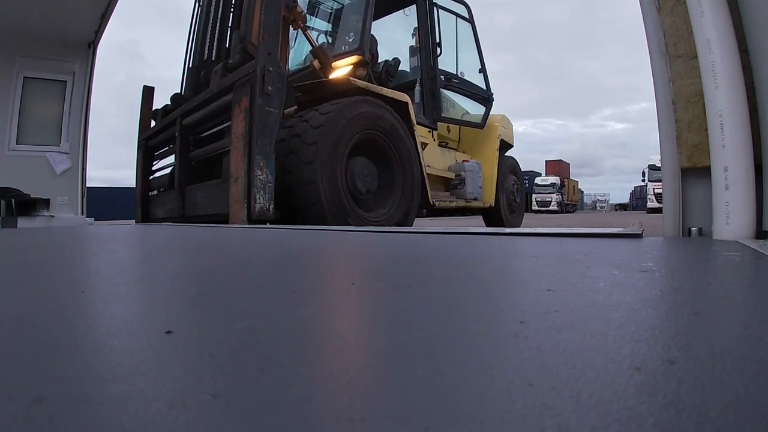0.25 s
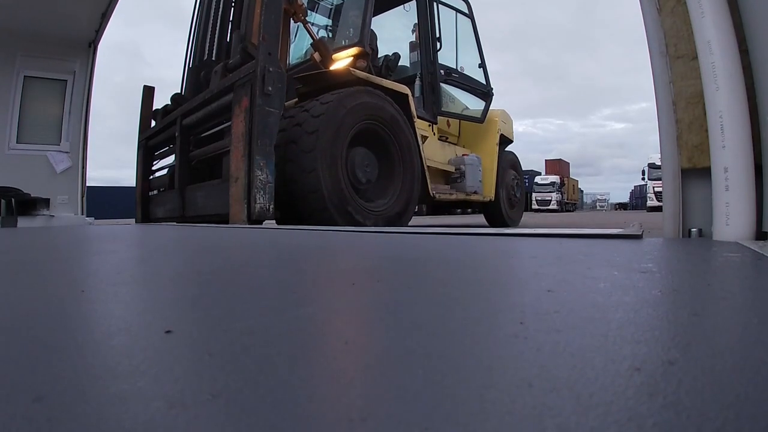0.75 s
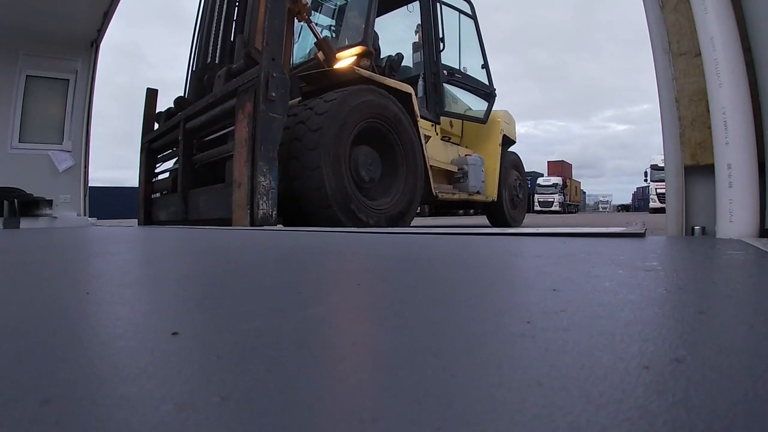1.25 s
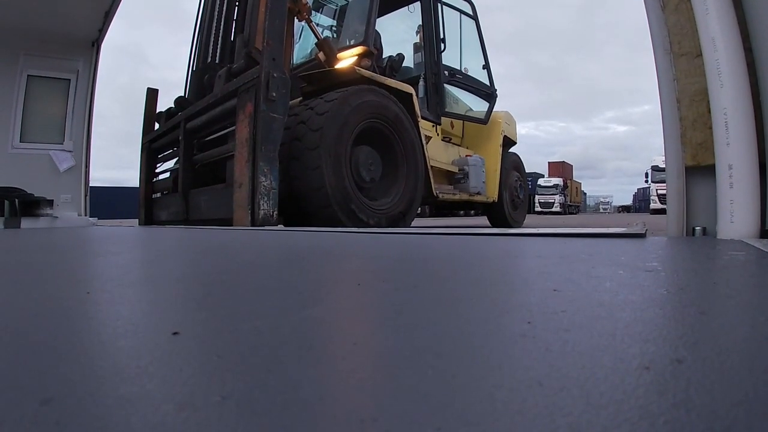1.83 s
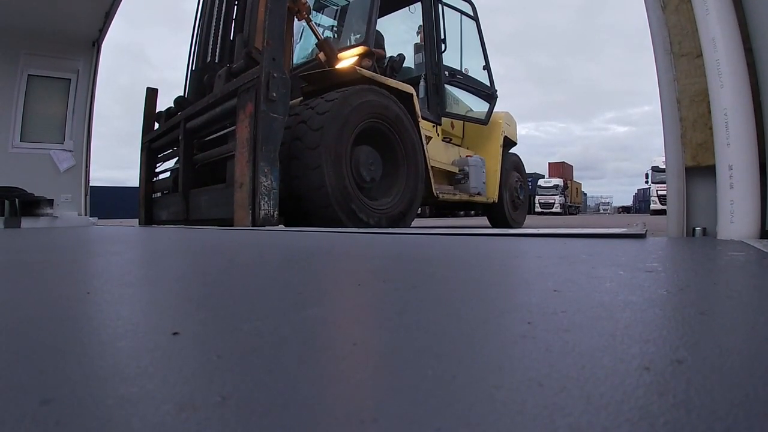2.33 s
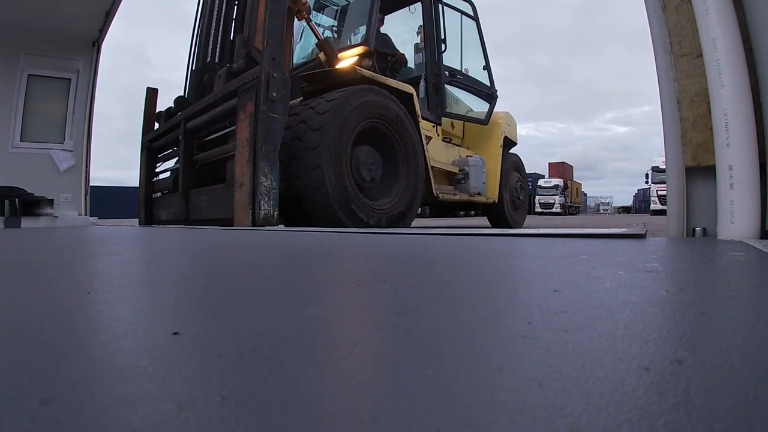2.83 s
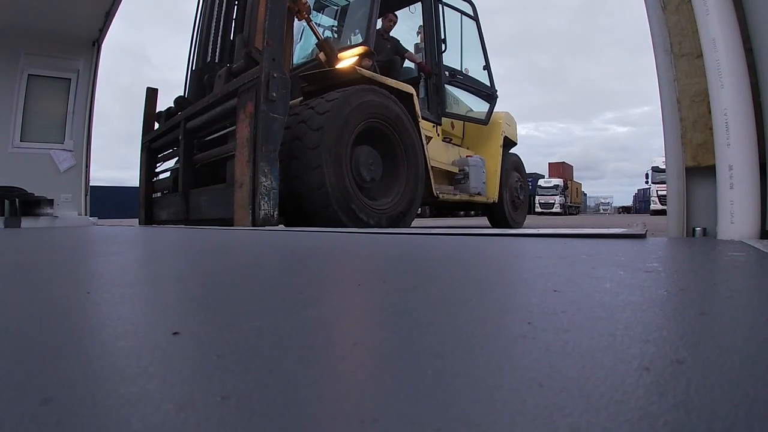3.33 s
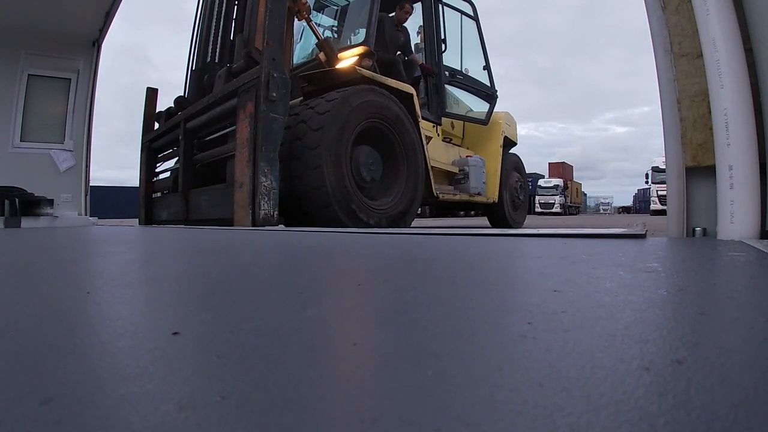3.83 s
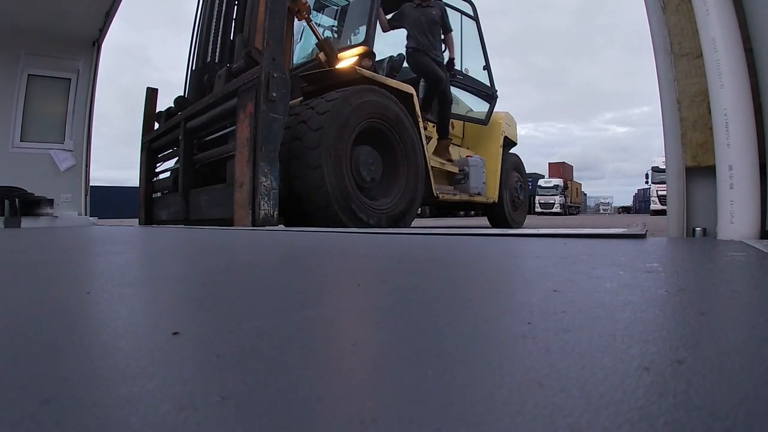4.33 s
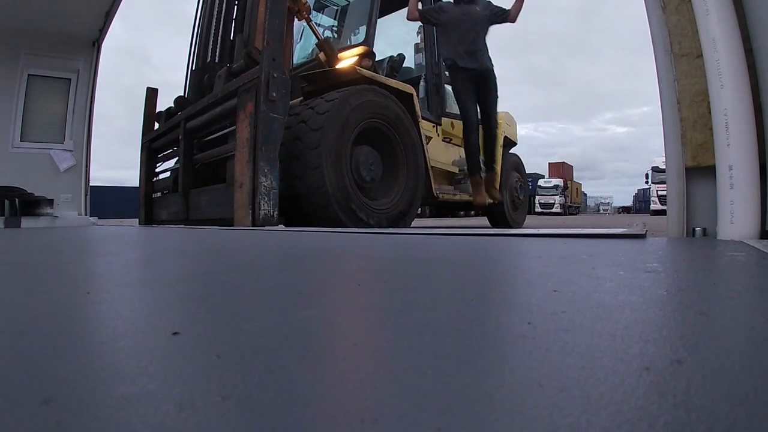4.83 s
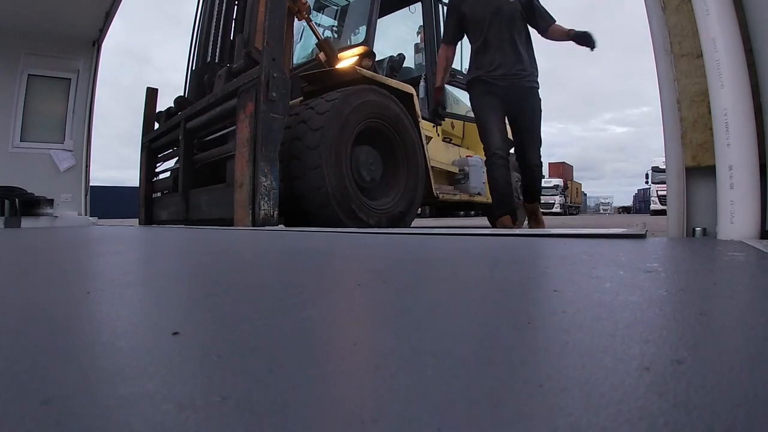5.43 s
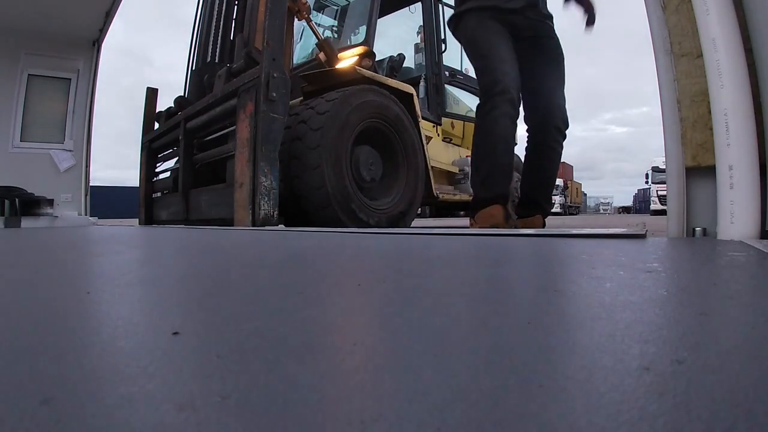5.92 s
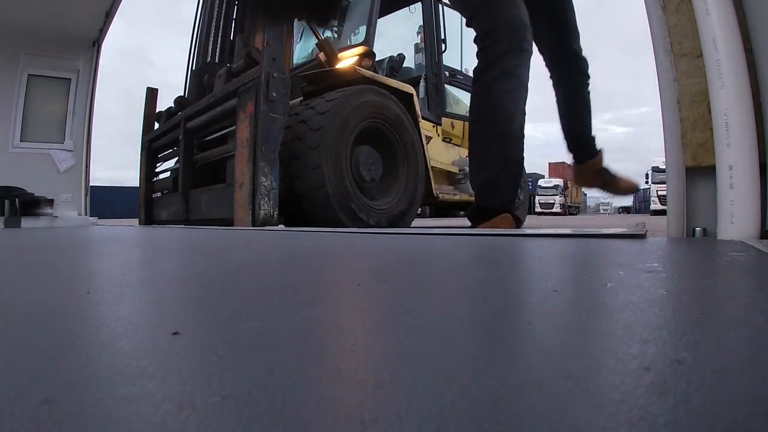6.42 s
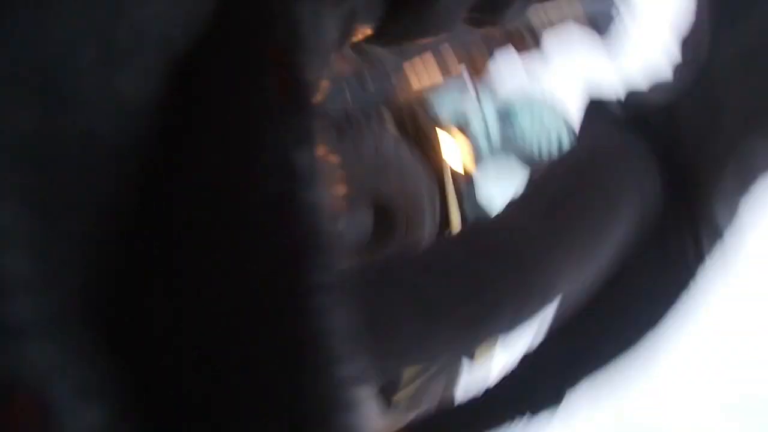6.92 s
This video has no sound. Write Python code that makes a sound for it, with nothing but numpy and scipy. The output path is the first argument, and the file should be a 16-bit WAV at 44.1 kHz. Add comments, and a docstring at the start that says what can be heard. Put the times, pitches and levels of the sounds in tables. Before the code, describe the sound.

A big forklift's six-cylinder diesel idles steadily just outside an open cabin door, booming and humming low. The machine groans to a halt with heavy thuds, rattling panels and a steel clank. A short whistling spit of air follows, then a harsher barking gush. The driver steps down with a knock and light scuffs. Finally a hand rubs and bumps the microphone on the floor, muffling everything.

```python
"""A heavy forklift's six-cylinder diesel idles throughout, just outside the open door of a cabin: firing-locked
tones and noise bursts. A wavering tone groans as the machine rolls to a stop, with thuds and rattles of decaying
modes and noise, and a steel clank. A thin noise hiss follows, then a spit of air with a whistling tail, and a
barking gush that eases to a rush. The driver steps down with a knock and scuffs. At last a hand bumps and half
covers the microphone. The recorder's gain ducks after loud blows."""
import sys
import numpy as np
from scipy import signal
from scipy.fft import rfft, irfft, next_fast_len
from scipy.io import wavfile
from scipy.ndimage import minimum_filter1d

SR = 44100
rng = np.random.default_rng(int(sys.argv[2]) if len(sys.argv) > 2 else 0)


def transcribe(signal):
    """Save signal, clipped to [-1, 1], as a 16-bit WAV file at the path in sys.argv[1]."""
    frames = np.atleast_2d(signal).T
    limited = np.clip(frames, -1, 1)
    pcm = np.round(limited * 32767).astype(np.int16)
    wavfile.write(sys.argv[1], SR, pcm)


N = 316197
TIME = np.arange(N) / SR


def from_db(db):
    """Decibels to amplitude gain."""
    return 10 ** (np.asarray(db) / 20)


def rms_one(x):
    """Scale to unit rms."""
    return x / np.sqrt(np.mean(x ** 2) + 1e-20)


def in_time(rows):
    """Interpolate a curve's columns at every sample."""
    seconds, *columns = np.transpose(rows)
    return [np.interp(TIME, seconds, column) for column in columns]


def drift(rate_hz):
    """Slow random curve through normal draws, rate_hz of them a second."""
    return np.interp(TIME * rate_hz, np.arange(2000), rng.standard_normal(2000))


def lift(hz, mode):
    """Gain in dB of a resonance; it halves at half_width_hz from the centre."""
    centre_hz, half_width_hz, peak_db = mode
    return peak_db / (1 + ((hz - centre_hz) / half_width_hz) ** 2)


def lowpass(x, top_hz):
    """Third-order low-pass."""
    return signal.sosfilt(signal.butter(3, top_hz, fs=SR, output="sos"), x)


def coloured(x, spectrum, modes=(), echo=0):
    """Give a signal a spectrum, resonances and the comb of close wall echoes; rms 1."""
    spectrum_hz, spectrum_db = np.transpose(spectrum)
    size = next_fast_len(N)
    bins_hz = np.maximum(np.fft.rfftfreq(size, 1 / SR), 1)
    gain_db = np.interp(np.log(bins_hz), np.log(spectrum_hz), spectrum_db)
    gain_db = gain_db + sum(lift(bins_hz, mode) for mode in modes)
    walls = np.zeros(size)
    walls[0] = 1
    delays_s = rng.uniform(.002, .022, 10)
    walls[(delays_s * SR).astype(int)] = echo * rng.choice([-1, 1], 10)
    return rms_one(irfft(rfft(x, size) * from_db(gain_db) * rfft(walls), size)[:N])


def noise(spectrum, modes=()):
    """Coloured noise of rms 1 with wall echoes."""
    return coloured(rng.standard_normal(N), spectrum, modes, echo=0.15)


def dying(start_s, t60_s, rise_s):
    """Envelope of a blow: exponential rise times an even decay in dB."""
    age = np.maximum(TIME - start_s, 0)
    return (1 - np.exp(-age / rise_s)) * from_db(-np.minimum(60 * age / t60_s, 200))


def add_mode(out, start_s, hz, db, t60_s):
    """Add one struck mode; it builds up within its first cycle."""
    at = int(start_s * SR)
    age = TIME[:min(int(2 * t60_s * SR), N - at)]
    build = 1 - np.exp(-3 * hz * age)
    decay = from_db(db - 60 * age / t60_s)
    out[at:at + len(age)] += build * decay * np.sin(2 * np.pi * hz * age)


def swell(shape, spectrum, flutter_db=0, modes=()):
    """Turbulent noise that builds up, holds and dies away."""
    start_s, attack_s, hold_s, t60_s, level_db = shape
    rise = np.clip((TIME - start_s) / attack_s, 0, 1) ** 2
    fall_db = np.clip(60 * (TIME - start_s - attack_s - hold_s) / t60_s, 0, 200)
    level = from_db(level_db - fall_db + flutter_db * drift(120))
    return rise * level * noise(spectrum, modes)


def contact_clicks(per_s):
    """Random clicks of either sign: tiny contacts between loose parts."""
    return rng.choice([-1, 1], N) * (rng.random(N) < per_s / SR)


# Standing waves of cabin and panels. Each row: centre in Hz, half width in Hz, lift in dB.
CABIN_MODES = [(110.7, 2.24, 11), (161, 14, 3.5), (504, 8.9, 10.5), (559.2, 7.3, 9)]


def tones(turns, rpm, orders, waver, waver_hz):
    """Sines locked to the crankshaft; each wavers, and swells as it crosses a standing wave."""
    out = np.zeros(N)
    for order, db in orders:
        hz = order * rpm / 60
        # a different delay per order merges the firings into a smooth throb
        delay_cycles = .183 * order ** 2
        phase = 2 * np.pi * (order * turns - delay_cycles) + waver * drift(waver_hz)
        swell_db = sum(lift(hz, mode) for mode in CABIN_MODES)
        level = from_db(db + swell_db) * (1 + waver * drift(waver_hz))
        out += level * np.sqrt(2) * np.sin(phase)
    return out


# Relative strength of each cylinder's firing in dB, in firing order.
CYLINDERS = [0.94, 0.21, -0.7, 0.48, -0.068, -0.26]


def firings(turns, repeat, fade, depth):
    """A noise burst per firing: part repeats with every two-turn cycle, part is new each time."""
    cycle, stroke = turns / 2 % 1, turns * 3
    number = stroke.astype(int)
    chance_db = 0.2 * rng.standard_normal(number[-1] + 1)
    strength = from_db(np.array(CYLINDERS)[number % len(CYLINDERS)] + chance_db[number])
    pattern = rng.standard_normal(6000)
    same = pattern[(cycle * len(pattern)).astype(int)]
    grain = np.sqrt(repeat) * same + np.sqrt(1 - repeat) * rng.standard_normal(N)
    # fade: decay in strokes; depth: share of the noise that decays
    return grain * strength * (1 - depth + depth * np.exp(-(stroke % 1) / fade))


# Boom level. Each row: time in seconds, relative level in dB.
BOOM_LEVEL = [(0, 0.5), (1.0, 1), (1.12, -6), (1.2, -3), (1.28, 5.5), (1.4, 1), (1.47, 6), (1.99, -3.5),
              (2.1, 7.5), (2.35, 2.5), (2.65, 5), (2.78, -1), (3.0, -0.5), (3.4, -1), (7.17, 0)]
# Lowest cabin resonance, met by the firing rate at idle: centre in Hz, half width in Hz, lift in dB.
BOOM_MODE = (40.1, 1.9, 5.25)


def boom(turns, rpm):
    """A sine at the firing rate, three per turn, lifted by the cabin's lowest resonance."""
    firing_hz = 3 * rpm / 60
    level_db, = in_time(BOOM_LEVEL)
    unsteady_db = .6 * drift(12)
    gain = from_db(level_db + lift(firing_hz, BOOM_MODE) + unsteady_db)
    return gain * np.cos(2 * np.pi * 3 * turns)


# Low tones of exhaust and belt-driven parts. Each row: multiple of crank speed, relative level in dB.
EXHAUST_ORDERS = [(4, -17), (7, -16), (7.8, -10.5), (8.8, -15), (9, -17), (10, -16), (10.3, -14),
                  (11, -15.5), (13, -17), (15.6, -20), (16, -23), (17, -22), (22, -21.5)]
# Low throb. Each row: multiple of crank speed, relative level in dB.
THROB_ORDERS = [(5, -8.5), (6, -8.5)]
# Throb level. Each row: time in seconds, relative level in dB.
THROB_LEVEL = [(0, 3), (.45, -7), (.8, -3), (1.15, -7), (1.6, -3), (2.7, -0.5), (3.4, .5), (4.6, -1),
               (5.5, 3), (7.17, -1)]
# Drone at four times the firing rate. Each row: multiple of crank speed, relative level in dB.
DRONE_ORDERS = [(12, -9.5)]
# Drone level. Each row: time in seconds, relative level in dB.
DRONE_LEVEL = [(0, -2.5), (1.55, -5.5), (1.68, 3.5), (1.9, 3.5), (2.1, 4), (2.4, -3.5), (2.75, -17),
               (2.98, 3), (3.3, -4.5), (4.1, -1), (5.1, -1.5), (7.17, 1)]
# Spectrum of the puffs. Each row: frequency in Hz, relative level in dB.
EXHAUST_SPECTRUM = [(15, -12), (45, -0.5), (75, -2.5), (105, 0.5), (140, 4), (170, 1.5), (187, -7.5),
                    (212, 2), (260, -12.5), (400, -64.5), (2000, -100)]


def exhaust(turns, rpm):
    """Crank-locked hum, throb and drone, with a noise puff per firing."""
    hum = tones(turns, rpm, EXHAUST_ORDERS, waver=.19, waver_hz=6)
    throb_db, = in_time(THROB_LEVEL)
    throb = from_db(throb_db) * tones(turns, rpm, THROB_ORDERS, waver=.17, waver_hz=6)
    drone_db, = in_time(DRONE_LEVEL)
    drone = from_db(drone_db) * tones(turns, rpm, DRONE_ORDERS, waver=.19, waver_hz=6)
    puffs = coloured(firings(turns, repeat=0.21, fade=0.68, depth=0.5), EXHAUST_SPECTRUM)
    return hum + throb + drone + from_db(-6.4) * puffs


# Tones of panels and pumps. Each row: multiple of crank speed, relative level in dB.
PANEL_ORDERS = [(18, -9.5), (19.5, -13), (23, -13), (24, -19), (26, -13.5), (29, -13), (30, -17),
                (38, -16.5), (41.7, -27.5), (42, -17.5), (43.4, -16.5), (46, -19.5)]
# Spectrum of the shaking. Each row: frequency in Hz, relative level in dB.
PANEL_SPECTRUM = [(180, -32.5), (235, -8), (310, 6.5), (370, 0), (440, -1), (510, 0.5), (580, -4.5),
                  (640, -7.5), (740, -9.5), (850, -22), (1200, -62.5), (4000, -100)]
# Panel resonances, fixed at any speed. Each row: centre in Hz, half width in Hz, lift in dB.
SINGING_MODES = [(490, 7.8, 4), (563, 6.4, 6), (567, 4, 4.5)]


def panels(turns, rpm):
    """Crank-locked tones of panels and pumps, plus firing noise ringing the panels."""
    shake = coloured(firings(turns, repeat=0.24, fade=0.65, depth=0.093), PANEL_SPECTRUM, SINGING_MODES)
    return tones(turns, rpm, PANEL_ORDERS, waver=0.3, waver_hz=8) + from_db(-1.0) * shake


# Spectrum of the clatter. Each row: frequency in Hz, relative level in dB.
CLATTER_SPECTRUM = [(400, -8.5), (800, -7), (1000, -2.5), (1350, 0.5), (1800, -5), (2600, -4.5),
                    (3600, -9.5), (4400, -11.5), (5300, -16.5), (6750, -21), (7200, -28), (8200, -36.5),
                    (12000, -41.5), (14500, -71)]
# Engine block resonances. Each row: centre in Hz, half width in Hz, lift in dB.
BLOCK_MODES = [(1106, 17, 1), (1195, 34, 0.5), (1960, 30, 0.5), (2480, 27, 2), (3100, 37, 2),
               (3670, 36, 4.5), (4340, 98, 2.5)]


def clatter(turns):
    """Knocking noise bursts, one per firing, ring the engine block."""
    knocks = firings(turns, repeat=.35, fade=.4, depth=.3)
    return coloured(knocks, CLATTER_SPECTRUM, BLOCK_MODES, echo=0.085)


# Crankshaft speed, hunting until it settles at idle. Each row: time in seconds, speed in rpm.
SPEED = [(0.0, 810), (0.12, 813), (0.35, 793.2), (0.6, 801.7), (0.82, 782.4), (1.0, 819.5), (1.18, 754),
         (1.38, 843.5), (1.55, 792), (1.72, 795), (1.9, 762.5), (2.25, 774), (2.5, 825.3), (2.74, 862.4),
         (2.92, 838.8), (3.2, 814.6), (4.2, 805.2), (5.1, 799.4), (7.17, 799.7)]
BOOM_DB, EXHAUST_DB, PANEL_DB, CLATTER_DB = -23, -18.5, -32, -40.5
# hand over the microphone: level change per voice, then a growing loss; the clatter is low-passed
COVER_AT_S, COVER_TAKES_S = 6.755, .03
COVER_BOOM_DB, COVER_EXHAUST_DB, COVER_PANEL_DB, COVER_CLATTER_DB = -6.5, -6, -6.5, 2.5
COVER_DB_PER_S, COVER_TOP_HZ = -11, 4599


def engine():
    """Three firings a turn boom, puff, shake panels and rattle the block; at last a hand muffles them."""
    rpm, = in_time(SPEED)
    turns = np.cumsum(rpm) / SR / 60
    since_cover_s = np.maximum(TIME - COVER_AT_S, 0)
    covered = np.minimum(since_cover_s / COVER_TAKES_S, 1)
    block = clatter(turns)
    block = block * (1 - covered) + lowpass(block, COVER_TOP_HZ) * covered
    voices = [(boom(turns, rpm), BOOM_DB, COVER_BOOM_DB),
              (exhaust(turns, rpm), EXHAUST_DB, COVER_EXHAUST_DB),
              (panels(turns, rpm), PANEL_DB, COVER_PANEL_DB),
              (block, CLATTER_DB, COVER_CLATTER_DB)]
    mix = sum(from_db(db + cover_db * covered) * voice for voice, db, cover_db in voices)
    return from_db(COVER_DB_PER_S * since_cover_s) * mix


# Running gear. Each row: time in seconds, pitch in Hz, level in dB.
GROAN = [(.33, 147.7, -50), (.42, 144.4, -19.5), (.53, 130.7, -28), (.68, 131.4, -32), (.8, 127, -33),
         (.9, 117, -18.5), (.99, 101.7, -16), (1.06, 95, -15), (1.14, 94, -59)]
GROAN_WAVER = 0.091   # radians of phase, and share of level


def groan():
    """A low, wavering sine that sinks as the machine rolls to a stop."""
    hz, db = in_time(GROAN)
    phase = 2 * np.pi * np.cumsum(hz) / SR + GROAN_WAVER * drift(30)
    return from_db(db) * (1 + GROAN_WAVER * drift(34)) * np.sqrt(2) * np.sin(phase)


# Dull blows. Each row: start in seconds, level in dB, pitch in Hz, t60 in seconds, overtone in dB re the pitch.
THUDS = [(.428, -22, 375, 0.46, -10), (.43, -22, 418, 0.51, -17), (.432, -19, 193, .3, -9),
         (.872, -11, 101, 0.23, -12), (0.884, -8.5, 195, 0.17, -6.5), (1.003, -12, 448, 0.066, -5),
         (1.006, -5.5, 277, 0.054, 2.5), (1.005, 2.5, 87, 0.13, -8), (1.016, 1, 198.6, 0.067, -8),
         (1.032, -11.5, 395, .12, -10), (1.047, -16.5, 238, 0.31, -2), (1.222, -12.5, 319, 0.19, -18),
         (1.228, -16, 494, 0.11, -15), (1.271, -4, 41.4, 0.35, -27), (1.275, 0.5, 83, 0.2, -16),
         (1.352, -9, 319, 0.2, -15.5), (1.352, -13, 407, 0.25, -21.5), (1.363, 1.5, 39.7, 0.2, -11),
         (1.41, -6.5, 137.7, 0.28, -6), (1.93, -17, 391.1, 0.24, -7.5), (1.93, -21, 235, 0.34, -4),
         (3.19, -16, 313.3, 0.095, -12), (3.19, -12, 110.1, 0.16, -9), (4.921, -9.5, 225.6, 0.073, -2.5),
         (5.331, -6.5, 204, 0.14, -1), (6.762, -2, 91.9, 0.046, -3.5), (6.762, -7.5, 271.9, 0.031, 0.5)]


def thuds():
    """Each dull blow rings a low mode and an overtone just above it."""
    out = np.zeros(N)
    for start_s, db, hz, t60_s, overtone_db in THUDS:
        add_mode(out, start_s, hz, db, t60_s)
        add_mode(out, start_s, hz * 1.25, db + overtone_db, t60_s)
    return out


# Hard blows: the steel clank with lighter knocks around it, and the driver's step down.
# Each row: start in seconds, ring in dB, crack in dB, crack rise in seconds, crack t60 in seconds, crack top in Hz.
HARD_BLOWS = [(1.003, -38, -23, .0014, 0.056, 2000), (1.036, -34, -19.5, .01, 0.46, 980),
              (1.15, -34.5, -17.5, 0.017, 0.5, 2980), (1.326, -24, -33.5, 0.0035, 0.081, 1514),
              (1.345, -10.5, -3, 0.0014, 0.19, 8550), (1.39, -27, -22.5, 0.0016, 0.46, 6000),
              (5.327, -30, -16, 0.0009, 0.12, 9140)]
# Ringing modes. Each row: frequency in Hz, relative level in dB, t60 in seconds.
RING_MODES = [(550, -10, 0.09), (580, -15, 0.22), (668, -16, 0.13), (970, -9.5, 0.099), (1060, -2.5, 0.1),
              (1110, -9, 0.11), (1300, -14.5, 0.2), (1600, -17, 0.13), (2070, -21.5, 0.2),
              (2530, -26.5, 0.073), (2950, -23, 0.22), (3583, -16.5, .11), (4490, -22.5, 0.2),
              (4797, -23, 0.18)]
# Spectrum of the crack. Each row: frequency in Hz, relative level in dB.
CRACK_SPECTRUM = [(200, 19), (500, 5.5), (1200, 0), (2000, -9.5), (3800, -9), (5500, -17), (6800, -16.5),
                  (8500, -28.5), (12500, -31), (15000, -52)]
STRIKE_SPREAD_DB = 1.5   # of each mode, from blow to blow
CRACK_CONTACTS_PER_S, CONTACT_POWER_SHARE = 1200, .5


def hard_blows():
    """Hard contact: a grainy crack, duller for a softer contact, and the ring of the modes."""
    contacts = rms_one(contact_clicks(CRACK_CONTACTS_PER_S))
    hiss = rng.standard_normal(N)
    grain = np.sqrt(CONTACT_POWER_SHARE) * contacts + np.sqrt(1 - CONTACT_POWER_SHARE) * hiss
    crack = coloured(grain, CRACK_SPECTRUM, echo=0.11)
    out = np.zeros(N)
    for start_s, ring_db, crack_db, rise_s, t60_s, top_hz in HARD_BLOWS:
        out += from_db(crack_db) * dying(start_s, t60_s, rise_s) * lowpass(crack, top_hz)
        for hz, db, ring_t60_s in RING_MODES:
            mode_db = ring_db + db + rng.normal(0, STRIKE_SPREAD_DB)
            add_mode(out, start_s + rng.uniform(0, 0.0045), hz, mode_db, ring_t60_s)
    return out


# Loose panels. Each row: start in seconds, level in dB, centre in Hz, rise in seconds, t60 in seconds.
RATTLES = [(.42, -23.5, 398, 0.0061, 0.61), (0.989, -34, 1400, .004, 0.16),
           (1.003, -31, 1610, 0.0011, 0.052), (1.034, -21.5, 1450, 0.012, 0.13),
           (1.034, -20, 416, 0.0057, 0.34), (1.155, -27, 2040, 0.013, 0.17),
           (1.155, -18.5, 377, 0.019, 0.4), (1.227, -22.5, 1500, 0.014, 0.15),
           (1.221, -18.5, 378, 0.0077, 0.28), (1.347, -18.5, 367, 0.003, 0.33),
           (1.9, -24.5, 329, 0.033, 2.2), (3.185, -23, 404.7, 0.0084, 0.16),
           (5.33, -30.5, 1389, 0.0041, 0.2), (5.328, -19, 315, 0.0033, 0.26)]
RATTLE_CONTACTS_PER_S, RATTLE_SPREAD = 900, 1.325   # band: centre / spread to centre * spread


def rattles():
    """A quick, uneven run of small contacts rings one panel and dies away."""
    out = np.zeros(N)
    for start_s, db, hz, rise_s, t60_s in RATTLES:
        band_hz = [hz / RATTLE_SPREAD, hz * RATTLE_SPREAD]
        panel = signal.butter(3, band_hz, "band", fs=SR, output="sos")
        ringing = rms_one(signal.sosfilt(panel, contact_clicks(RATTLE_CONTACTS_PER_S)))
        out += from_db(db) * dying(start_s, t60_s, rise_s) * ringing
    return out


# Swell: start, attack, hold and t60 in seconds, level in dB.
SPIT_SWELL = (3.465, .052, .04, .27, -31.5)
WHISTLE_SWELL = (3.53, .05, .06, .34, -37.5)
# Spectra. Each row: frequency in Hz, relative level in dB.
SPIT_SPECTRUM = [(300, -34), (1000, 1), (1600, -6), (2400, 1), (4000, -0.5), (6800, -5), (8500, -12),
                 (13000, -19.5), (15500, -36)]
WHISTLE_SPECTRUM = [(1500, -13), (3600, -4), (4350, -1), (5100, -17), (6200, -9), (7200, -33), (13000, -37),
                    (15500, -55)]
# Resonances. Each row: centre in Hz, half width in Hz, lift in dB.
SPIT_MODES = [(1599.4, 139, 9), (2602, 49.7, 7.5), (4500, 67, 0)]
WHISTLE_MODES = [(4130, 45, 8), (4350, 25, 9), (6010, 40, 6), (6300, 80, 4)]


def air_spit():
    """A turbulent spit of air; narrow high resonances whistle in its tail."""
    spit = swell(SPIT_SWELL, SPIT_SPECTRUM, flutter_db=0.5, modes=SPIT_MODES)
    return spit + swell(WHISTLE_SWELL, WHISTLE_SPECTRUM, modes=WHISTLE_MODES)


# Swells: start, attack, hold and t60 in seconds, level in dB.
GUSH_SWELL = (4.911, .016, .095, .13, -22.8)
RUSH_SWELL = (4.9, .03, .33, .22, -25.3)
BARK_SWELL = (4.912, .008, .014, .1, -28)
SURGE_SWELL = (5.17, .06, .045, .13, -34.5)
# Spectra. Each row: frequency in Hz, relative level in dB.
RUSH_SPECTRUM = [(100, -11.5), (250, 16.5), (550, 5.5), (800, -5.5), (1200, -1.5), (2400, -4), (3500, -7.5),
                 (5000, -12), (6700, -15), (8200, -26.5), (12500, -29), (15000, -46)]
BARK_SPECTRUM = [(900, -19), (1500, -10), (1900, 10), (2200, -18), (3200, -29), (8000, -60)]
SURGE_SPECTRUM = [(600, -19), (1200, -1.5), (1700, 5), (2700, 1.5), (3600, -14), (8000, -35.5),
                  (15000, -67)]
# Resonances. Each row: centre in Hz, half width in Hz, lift in dB.
GUSH_MODES = [(417.8, 24.7, 8.3), (1777, 122, 8.1), (2370, 72, 9.1), (2952, 120, 6)]
RUSH_MODES = [(572.9, 15, 10.5), (1140, 90, 6.5), (1670, 54, 4.5), (2300, 77, 2.5), (2790, 64, 3)]


def air_gush():
    """Turbulent air opens with a short bark, eases to a rush and surges gently before it shuts."""
    gush = swell(GUSH_SWELL, RUSH_SPECTRUM, modes=GUSH_MODES)
    rush = swell(RUSH_SWELL, RUSH_SPECTRUM, modes=RUSH_MODES)
    bark = swell(BARK_SWELL, BARK_SPECTRUM)
    surge = swell(SURGE_SWELL, SURGE_SPECTRUM)
    return gush + rush + bark + surge


# Swell: start, attack, hold and t60 in seconds, level in dB.
HAND_SWELL = (6.714, .05, .012, .07, -23)
# Spectrum of the rub. Each row: frequency in Hz, relative level in dB.
RUB_SPECTRUM = [(80, 13.5), (350, 2), (650, 10.5), (1000, 1.5), (1800, 2), (3500, -7.5), (6500, -17),
                (8500, -27), (13000, -41), (15500, -42)]
# Slips of the skin. Each row: start in seconds, level in dB.
CATCHES = [(6.742, -23), (6.747, -32), (6.756, -24), (6.762, -18.5), (6.775, -28), (6.778, -42)]
# Spectrum of the slips. Each row: frequency in Hz, relative level in dB.
CATCH_SPECTRUM = [(200, 9), (700, 10), (1400, -7), (3500, 1), (6000, -8), (8500, -26), (13000, -31),
                  (15500, -37)]
CATCH_T60_S = 0.028


def hand():
    """A fluttering noise rub, and sharp little slips of skin on the microphone's housing."""
    rub = swell(HAND_SWELL, RUB_SPECTRUM, flutter_db=3.0)
    envelope = sum(from_db(db) * dying(start_s, CATCH_T60_S, rise_s=.0003) for start_s, db in CATCHES)
    return rub + envelope * coloured(rng.standard_normal(N), CATCH_SPECTRUM)


# Light scuffs and rattles. Each row: start in seconds, level in dB, t60 in seconds.
SCUFFS = [(.62, -37.5, 0.21), (.718, -39, 0.16), (1.035, -39, 0.37), (1.153, -41.5, 0.31),
          (2.53, -38, 0.062), (5.491, -40, 0.14), (5.519, -29, 0.041), (5.885, -38, 0.067),
          (5.902, -38, 0.049)]
# Spectrum of the scuffs. Each row: frequency in Hz, relative level in dB.
SCUFF_SPECTRUM = [(600, -22), (2000, -10.5), (3300, 5), (5000, -2.5), (6500, -3), (8200, -20), (12500, -23),
                  (15000, -36.5)]


def scuffs():
    """Short, bright and slightly grainy noise rubs."""
    envelope = sum(from_db(db) * dying(start_s, t60_s, rise_s=0.0019) for start_s, db, t60_s in SCUFFS)
    grain = from_db(1.5 * drift(200))
    return envelope * grain * noise(SCUFF_SPECTRUM)


# Swell: start, attack, hold and t60 in seconds, level in dB.
LEAK_SWELL = (1.72, .15, .66, .3, -63)
# Spectrum of the hiss. Each row: frequency in Hz, relative level in dB.
LEAK_SPECTRUM = [(5000, -11), (7500, -0.5), (8800, -13), (9800, -7), (11000, -2), (12200, -7), (13500, -13),
                 (15000, -35)]


def air_leak():
    """A thin, faint hiss of leaking air: high, fluttering noise."""
    return swell(LEAK_SWELL, LEAK_SPECTRUM, flutter_db=1.0)


def scene():
    """Engine, groan, blows, escaping air, scuffs and the hand, summed to one channel."""
    machine_and_blows = engine() + groan() + thuds() + hard_blows() + rattles()
    air = air_spit() + air_gush() + air_leak()
    return (machine_and_blows + air + hand() + scuffs())[None]


def smoothed(x, seconds):
    """One-pole average over the given time."""
    keep = np.exp(-1 / (seconds * SR))
    return signal.lfilter([1 - keep], [1, -keep], x)


# listens above the bass; cuts a share of the excess over the threshold
AGC_THRESHOLD_DB, AGC_SHARE, AGC_ABOVE_HZ = -17, 0.81, 153
AGC_WINDOW_S, AGC_ATTACK_S, AGC_HOLD_S, AGC_RELEASE_S = 0.017, 0.0022, 0.63, 0.48
AGC_AHEAD_S = 0.0033   # the cut is applied this much early


def gain_control(x):
    """Each loud blow quickly turns the gain down; it stays down a moment, then creeps back."""
    highpass = signal.butter(2, AGC_ABOVE_HZ, "high", fs=SR, output="sos")
    heard = signal.sosfilt(highpass, x)
    level_db = 10 * np.log10(smoothed(heard ** 2, AGC_WINDOW_S) + 1e-12)
    cut_db = np.maximum(AGC_SHARE * (level_db - AGC_THRESHOLD_DB), 1e-6)
    half = int(AGC_HOLD_S * SR / 2)
    # running maximum over the past hold time
    held_db = -minimum_filter1d(-cut_db, 2 * half + 1, origin=half, mode="nearest")
    # the cut in dB decays exponentially unless a larger one arrives
    release = TIME / AGC_RELEASE_S
    released_db = np.exp(np.maximum.accumulate(np.log(held_db) + release) - release)
    gain_db = -np.interp(TIME + AGC_AHEAD_S, TIME, smoothed(released_db, AGC_ATTACK_S))
    return x * from_db(gain_db)


CUTOFF_HZ = 15500


def record(dry):
    """The gain ducks after loud blows, peaks are rounded, the top is cut."""
    rounded = 1.15 * np.tanh(gain_control(dry[0])[None] / 1.15)
    return signal.sosfilt(signal.cheby2(14, 70, CUTOFF_HZ, fs=SR, output="sos"), rounded)


dry = scene()
out = record(dry)
transcribe(out)
```